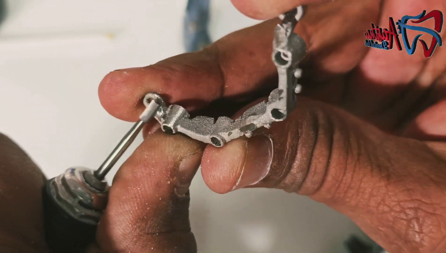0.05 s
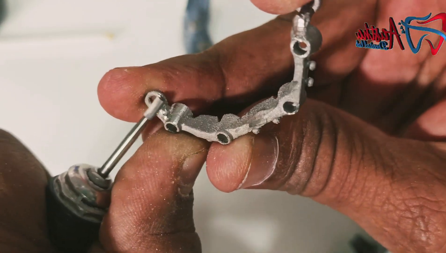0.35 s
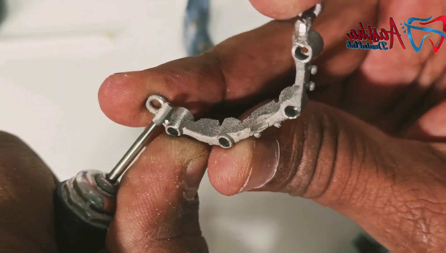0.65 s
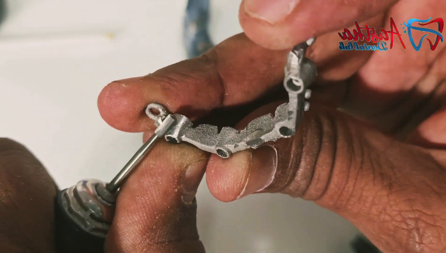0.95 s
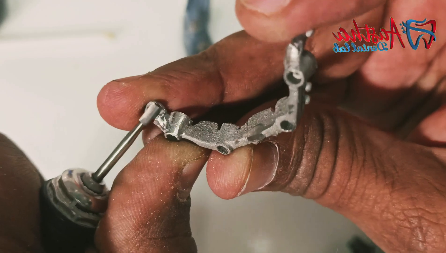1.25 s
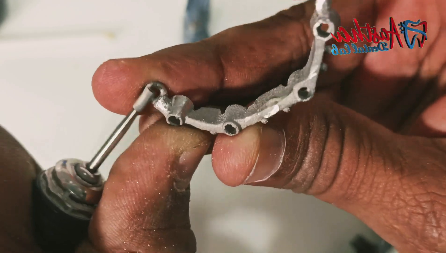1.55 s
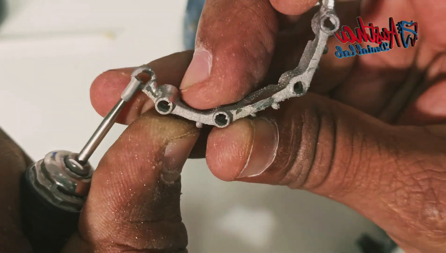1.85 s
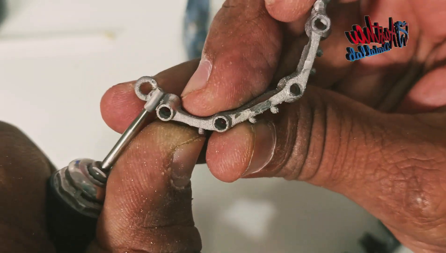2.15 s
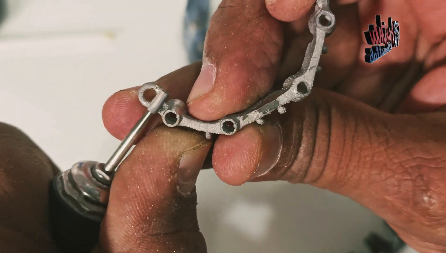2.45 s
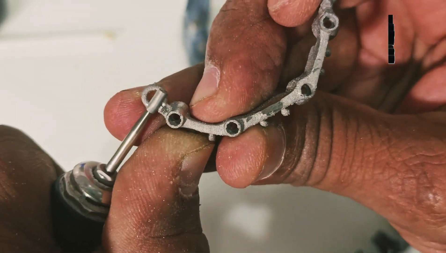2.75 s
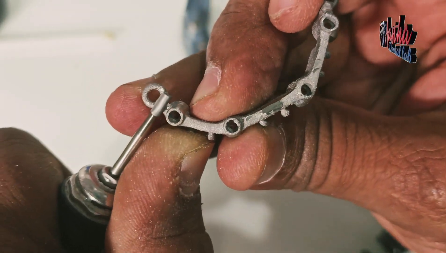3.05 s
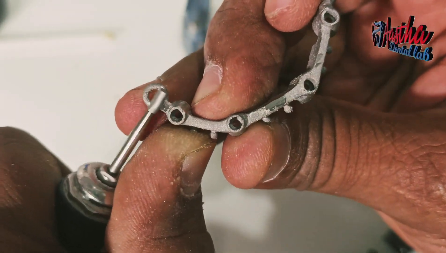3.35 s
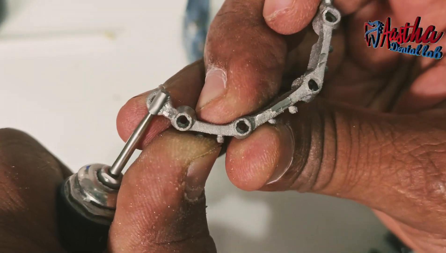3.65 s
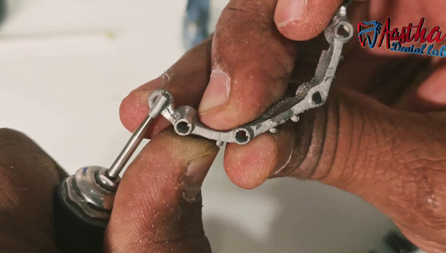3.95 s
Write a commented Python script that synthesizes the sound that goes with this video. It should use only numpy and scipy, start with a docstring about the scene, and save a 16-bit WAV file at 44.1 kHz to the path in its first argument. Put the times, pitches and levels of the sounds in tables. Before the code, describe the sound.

A rotary tool grinds metal in two buzzing, rasping passes with a short pause between.

```python
"""At a workbench indoors, a stereo microphone close to a handheld rotary tool grinding a small cast
metal frame: two passes with a short pause. The flutes of the bur strike the metal on every turn and
make it ring; the uneven cut buzzes and the load drags the motor down. In the pause the motor runs
free and speeds up, a faint whine over the hum of the room."""
import sys
import numpy as np
from scipy.fft import rfft, irfft, next_fast_len
from scipy.io import wavfile
from scipy.ndimage import uniform_filter1d, map_coordinates

SR = 44100
rng = np.random.default_rng(int(sys.argv[2]) if len(sys.argv) > 2 else 0)


def generate_wav(signal):
    """Clip the signal to [-1, 1] and save it as 16-bit WAV at the path in sys.argv[1]."""
    frames = np.transpose(np.atleast_2d(signal))
    scaled = np.clip(frames, -1, 1) * 32767
    pcm = np.round(scaled).astype(np.int16)
    wavfile.write(sys.argv[1], SR, pcm)


N = 176400
TIME = np.arange(N) / SR

# shaft speed: time_s, turns_per_s
SHAFT_SPEED = [(0, 270), (0.11, 284.5), (0.25, 285), (0.41, 271), (0.57, 280), (0.69, 290), (0.8, 271),
               (0.95, 269), (1.08, 262), (1.4, 255), (1.6, 269.6), (1.71, 280), (1.86, 298), (2.15, 280),
               (2.33, 280), (2.51, 274), (2.68, 268), (2.93, 260), (3.1, 264.5), (3.25, 264.5), (3.37, 262),
               (3.55, 259.5), (3.8, 255), (4, 256)]
# bur on the metal: start_s, end_s
PASS_TIMES = [(0.08, 1.712), (2.143, 4.1)]
# force of the cut, a list per pass: time_s, ring_gain_db, rasp_gain_db
CUT_FORCE = [
    [(0.095, -13.5, -35.5), (0.117, -9.5, -29.5), (0.219, -11.5, -33.5), (0.309, -12, -27),
     (0.367, -12, -30), (0.769, -12, -28.5), (0.787, -13.5, -24.5), (0.921, -12.5, -32.5),
     (0.965, -13, -25.5), (1.117, -12.5, -31), (1.279, -11.5, -26), (1.471, -12, -27), (1.519, -25, -39.5),
     (1.537, -10, -32), (1.599, -11.5, -31.5), (1.645, -13.5, -36.5), (1.675, -11, -31), (1.7, -19, -33.5)],
    [(2.16, -16.5, -28), (2.276, -14, -24), (2.338, -13.5, -25.5), (2.682, -15, -20.5), (2.718, -15, -21.5),
     (2.994, -14, -23.5), (3.014, -15.5, -22), (3.066, -14, -21.5), (3.2, -14, -20), (3.272, -13, -22),
     (3.296, -13, -20), (3.312, -15.5, -27.5), (3.328, -13, -23), (3.424, -13, -23.5), (3.686, -13.5, -22),
     (3.81, -11.5, -21), (3.968, -13.5, -22.5), (4.0, -15, -21)],
]
# resonances of the held frame, a list per pass: frequency_hz, gain_db
FRAME_COLOUR = [
    [(590, -46.5), (1000, -35.5), (1750, -31), (2150, -17.5), (2550, -22), (2950, -19.5), (3550, -24),
     (4300, -18), (5700, -12.5), (8100, -23), (11000, -21), (12350, -1), (13500, -12), (15200, 2),
     (15750, -6.5)],
    [(590, -42.5), (1050, -22.5), (1600, -26.5), (2150, -17), (2950, -13), (3500, -19), (4500, -10.5),
     (5450, -3.5), (7000, -14.5), (10000, -17.5), (12000, -10.5), (13900, -5.5), (15200, -0.5), (15750, -7)],
]
# stereo balance of the frame, a list per pass: frequency_hz, left_minus_right_db
FRAME_BALANCE = [
    [(1350, -12), (2950, 3.5), (5400, 4), (10000, -6), (13000, 1)],
    [(1350, -4), (2950, 8.5), (5450, 6), (10500, -4.5), (15200, 1)],
]
# how much the bur skids: time_s, skid_db
BUR_SKID = [(0.2, -5.5), (0.3, 0), (0.76, -4), (0.84, -9), (1.33, -8), (1.41, -4), (2.2, -3.5), (2.29, 1.5),
            (2.58, -2), (2.88, -14.5), (3.01, -7), (3.1, -1.5), (3.45, -9.5), (3.56, -4)]
# extra pressure on the bur: time_s, pressure_0_to_1
BUR_PRESSURE = [(0.95, 0), (1.25, 0.86), (1.44, 0.8), (1.54, 0)]
# tones of the gripping bur: shaft_order, left_db, right_db
GRIP_TONES = [(9, -3.5, -10), (10, -3, -7.5), (11, 1.5, -5.5), (12, -8, -6), (13, -6.5, -12),
              (14, -6.5, -7.5), (15, -2, -2), (16, 6, -3.5), (17, 0.5, -6), (21, 3, -1.5), (23, -1, 0)]
# chatter of the shank: time_s, gain_db
CHATTER_GAIN = [(0.1, -37), (0.11, -44.5), (0.41, -34.5), (0.46, -65), (0.5, -33), (0.66, -39.5),
                (1.12, -34), (1.14, -47), (1.53, -37), (1.55, -32.5), (1.83, -48), (2.13, -51),
                (2.15, -29.5), (2.21, -27.5), (2.43, -58), (2.47, -28), (2.8, -32), (2.93, -43),
                (3.02, -24), (3.04, -31), (3.23, -30), (3.3, -36.5), (3.41, -33), (3.66, -40),
                (3.78, -28.5), (4.0, -47)]
# its tones, strongest on the eighth order: shaft_order, left_db, right_db
CHATTER_TONES = [(7, -12.5, -14.5), (8, 2, -1), (9, -9, -12.5), (11, -3, -9)]
# shaking of the frame: time_s, gain_db
SHAKE_GAIN = [(0.1, -49), (0.13, -47.5), (0.76, -74), (0.79, -44.5), (1.35, -68.5), (1.54, -44.5),
              (1.74, -74), (2.46, -49), (2.54, -40), (2.78, -40.5), (2.83, -32), (2.93, -44.5), (3.21, -32),
              (3.36, -51), (3.62, -35), (3.75, -52), (3.97, -35.5), (4.0, -47)]
# its low tones: shaft_order, left_db, right_db
SHAKE_TONES = [(1, -19.5, -31), (3, -9.5, -3.5), (5, -9, -1)]
# whine of the motor: shaft_order, level_db
MOTOR_TONES = [(1, -64.5), (3, -63.5), (5, -64), (6, -62), (10, -53), (11, -64), (15, -60.5), (49, -55),
               (50, -47), (51, -57), (52, -51), (53, -56)]
# hiss of the bearing: frequency_hz, gain_db
BEARING_COLOUR = [(290, -53), (500, -15.5), (877, -10.5), (985, -15), (1170, -9), (1540, -18), (1700, -9.5),
                  (2860, -6.5), (4950, -13), (8090, -16), (8570, -20.5), (15200, -7)]
# rumble of the room: frequency_hz, gain_db
ROOM_COLOUR = [(15, -38), (25, -6), (98, -0.5), (179, -6), (291, 0), (480, -5), (653, -22), (700, -10),
               (910, -24), (1540, -120)]
# hum of the room: pitch_hz, base_level_db
HUM_TONES = [(102, -72), (350, -67)]
# rise and fall of that hum: time_s, gain_db
HUM_GAIN = [(0.05, 9), (0.2, -2.5), (1.35, 1.5), (1.55, 5), (2.12, 12), (2.25, -0.5), (4, 5)]

FLUTE_COUNT, BITE_S, LIFT_S = 10, 0.0095, 0.023
UNEVEN_DB, WANDER_TURNS, WANDER_HZ = 4.5, 0.006, 9  # slow drift of each flute's bite and contact point
SCATTER_DB, JITTER_S = 4.5, 2.4e-5  # scatter from blow to blow at a skid of 0 dB
RASP_DB, RING_DB, GRIT_DB, GRIP_DB = 4.5, 3, 2.5, -11  # gains on top of the force and skid curves
GRIT_PULSE_DB, BEARING_PULSE_DB = 6, 2.5  # swells once a turn
FLUTTER_DB, FLUTTER_HZ = 0.5, 700
LOW_CUT_HZ, SPLIT_HZ, TOP_HZ = 700, 9060, 15780  # rasp lies below the split, ring above
PRESS_SAG = 0.011  # share by which the resonances fall at full pressure
ECHO_COUNT, ECHO_SPREAD_S, ECHO_DB, HAND_HZ = 12, 0.002, 5.5, 4.011
BEARING_DB, ROOM_DB = -37, -55.5


def grinding(turns):
    """Close up, flute blows and grit ring the frame: a rasp in the middle, a fluttering ring on top."""
    skid = amp(curves(BUR_SKID)[0])
    pressure = np.clip(curves(BUR_PRESSURE)[0], 0, 1)
    grit = unit(rng.standard_normal(N) * amp(GRIT_PULSE_DB * np.sin(2 * np.pi * turns)))
    drive = bench_reflections(unit(flute_blows(turns, skid)) + amp(GRIT_DB) * skid * grit)
    out = np.zeros((2, N))
    for span, force, colour, balance in zip(PASS_TIMES, CUT_FORCE, FRAME_COLOUR, FRAME_BALANCE):
        relaxed = frame_resonance(drive, colour, balance, tuning=1)
        pressed = frame_resonance(drive, colour, balance, tuning=1 - PRESS_SAG)
        metal = (1 - pressure) * relaxed + pressure * pressed
        rasp = filtered(metal, lambda hz: 1 / (1 + (hz / SPLIT_HZ) ** 20))
        ring = (metal - rasp) * amp(FLUTTER_DB * wobble(FLUTTER_HZ))
        ring_db, rasp_db = curves(force)
        cut = amp(ring_db + RING_DB) * steady(ring) + amp(rasp_db + RASP_DB) * steady(rasp)
        out += contact(*span) * cut
    return out


def flute_blows(turns, skid):
    """Each flute strikes once a turn; bite and contact point drift, and skidding scatters the blows."""
    out, taps = np.zeros(N + 32), np.arange(-7, 9)
    turn = np.arange(int(turns[-1]))
    turn_s = np.interp(turn, turns, TIME)
    loose = np.interp(turn_s, TIME, skid)
    for flute in range(FLUTE_COUNT):
        place = turn + (flute + rng.random()) / FLUTE_COUNT + WANDER_TURNS * wobble(WANDER_HZ, turn_s)
        late, hard = rng.standard_normal((2, 2048))[:, :len(turn)]
        strike_s = np.interp(place, turns, TIME) + JITTER_S * loose * late
        at = np.clip(strike_s, 0, TIME[-1])[:, None] * SR
        size = amp(UNEVEN_DB * wobble(WANDER_HZ, turn_s) + SCATTER_DB * loose * hard)
        index = at.astype(int) + taps
        offset = index - at
        click = np.sinc(offset) * np.cos(np.pi * offset / 16) ** 2  # can land between samples
        out += np.bincount((index + 8).ravel(), (size[:, None] * click).ravel(), len(out))
    return out[:N]


def frame_resonance(drive, colour, balance, tuning):
    """The frame rings after each blow, thin in the bass, each band leaning left or right."""
    def response(hz):
        low_cut_db = 40 * np.log10(1 + (LOW_CUT_HZ / (hz + 50)) ** 2)
        sides = amp(along(balance, hz) * np.array([[.5], [-.5]]))
        return causal(along(colour, hz / tuning) - low_cut_db) * sides
    return filtered(drive, response)


def bench_reflections(direct):
    """Hands and bench add close reflections that shift as the hands move, different left and right."""
    delays_s = rng.uniform(0, ECHO_SPREAD_S, (2, ECHO_COUNT))
    echoes = [sum(np.roll(direct, int(s * SR)) * wobble(HAND_HZ) for s in side) for side in delays_s]
    return direct + amp(ECHO_DB) * np.array(echoes) / np.sqrt(ECHO_COUNT)


def contact(start_s, end_s):
    """The bur bites and lifts off: 1 on the metal, 0 clear of it."""
    return np.clip((TIME - start_s) / BITE_S, 0, 1) * np.clip((end_s - TIME) / LIFT_S + .5, 0, 1)


def grip_buzz(turns):
    """A dense buzz grows with the force while the bur grips, and fades as it skids."""
    level = sum(contact(*span) * amp(curves(force)[1]) for span, force in zip(PASS_TIMES, CUT_FORCE))
    skid = amp(curves(BUR_SKID)[0])
    tones = shaft_tones(turns, GRIP_TONES, waver_db=4, waver_hz=30.03, slip_rad=0.52)
    return amp(GRIP_DB) * level / (1 + skid) * tones


def chatter_and_shake(turns):
    """The uneven cut shakes the shank and the frame at multiples of the shaft speed."""
    chatter = shaft_tones(turns, CHATTER_TONES, waver_db=6.0, waver_hz=59.6, slip_rad=0.66)
    shake = shaft_tones(turns, SHAKE_TONES, waver_db=4.5, waver_hz=24.89, slip_rad=0.31)
    touching = sum(contact(*span) for span in PASS_TIMES)
    return touching * (amp(curves(CHATTER_GAIN)[0]) * chatter + amp(curves(SHAKE_GAIN)[0]) * shake)


def motor(turns):
    """Under the cut and through the pause: shaft whine and a bearing hiss that swells once a turn."""
    hiss = unit(noise(BEARING_COLOUR, width=0.99) * amp(BEARING_PULSE_DB * np.sin(2 * np.pi * turns)))
    whine = shaft_tones(turns, MOTOR_TONES, waver_db=5.5, waver_hz=40, slip_rad=0.95)
    return amp(BEARING_DB) * hiss + whine


def room_tone():
    """Behind the tool: a wide, low rumble and a wavering hum in the centre."""
    hum = np.zeros(N)
    for hz, db in HUM_TONES:
        peak = np.sqrt(2) * amp(db + 1.4 * wobble(10))
        hum += peak * np.sin(2 * np.pi * hz * TIME + 0.38 * wobble(12))
    return amp(ROOM_DB) * noise(ROOM_COLOUR, width=0.67) + amp(curves(HUM_GAIN)[0]) * hum


def shaft_tones(turns, table, waver_db, waver_hz, slip_rad):
    """Stereo tones locked to the shaft, each wavering in level and phase."""
    out = np.zeros((2, N))
    for order, *db in table:
        phase = 2 * np.pi * (order * turns + rng.random()) + slip_rad * wobble(waver_hz)
        side_phase = rng.uniform(-1.29, 1.0) * np.array([[1], [-1]])
        peak = np.sqrt(2) * amp(np.array(db)[:, None] + waver_db * wobble(waver_hz))
        out += peak * np.sin(phase + side_phase)
    return out


def noise(colour, width):
    """Coloured stereo noise of rms 1."""
    mid, side = filtered(rng.standard_normal((2, N)), lambda hz: amp(along(colour, hz)))
    return unit(np.array([mid + width * side, mid - width * side]))


def amp(db):
    """Decibels to amplitude."""
    return 10 ** (np.asarray(db) / 20)


def unit(x):
    """x scaled to rms 1."""
    return x / np.sqrt(np.mean(x ** 2) + 1e-20)


def steady(x):
    """x with its rms over 50 ms held at 1."""
    power = uniform_filter1d(np.mean(x ** 2, axis=0), size=2200)
    return x / np.sqrt(np.abs(power) + 1e-12)


def along(points, hz):
    """A spectrum interpolated on a log frequency axis."""
    knots_hz, values = np.transpose(points)
    return np.interp(np.log(hz + 1), np.log(knots_hz + 1), values)


def curves(rows):
    """One value per sample for each column after the time."""
    time_s, *columns = np.transpose(rows)
    return [np.interp(TIME, time_s, column) for column in columns]


def wobble(rate_hz, t=TIME):
    """A smooth random curve, rate_hz knots a second."""
    return map_coordinates(rng.standard_normal(8192), [t * rate_hz], mode="mirror")


def filtered(x, response):
    """x shaped by a response of frequency."""
    size = next_fast_len(N + 8192)
    return irfft(rfft(x, size) * response(np.fft.rfftfreq(size, 1 / SR)), size)[..., :N]


def causal(db):
    """The minimum-phase response with this gain: it rings only after a blow."""
    cepstrum = irfft(np.log(amp(db)))
    half = len(cepstrum) // 2
    cepstrum[1:half] *= 2
    cepstrum[half + 1:] = 0
    return np.exp(rfft(cepstrum))


def scene():
    """One shaft times all the sounds of the tool up close; the room lies behind."""
    turns = np.cumsum(curves(SHAFT_SPEED)[0]) / SR
    return grinding(turns) + grip_buzz(turns) + chatter_and_shake(turns) + motor(turns) + room_tone()


def record(dry):
    """The recorder keeps nothing above its band limit."""
    return filtered(dry, lambda hz: hz < TOP_HZ)


dry = scene()
out = record(dry)
generate_wav(out)
```